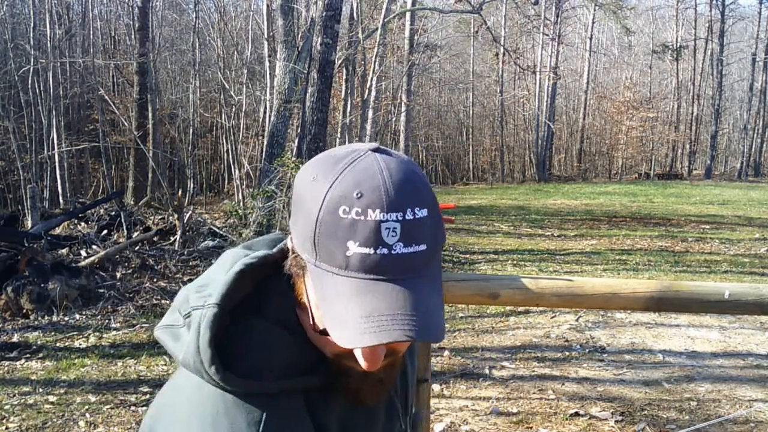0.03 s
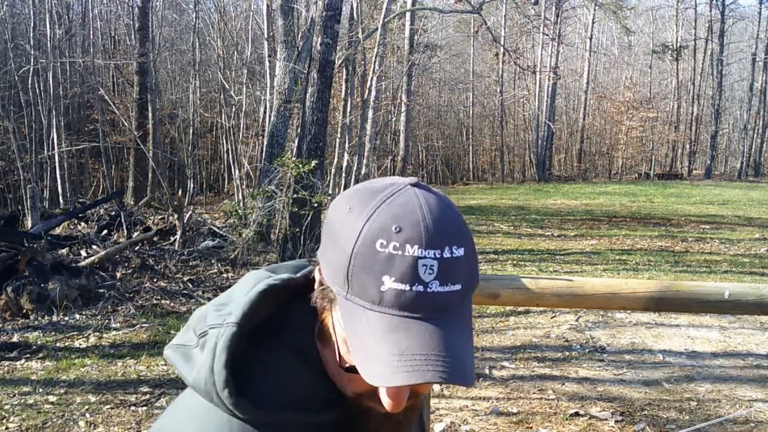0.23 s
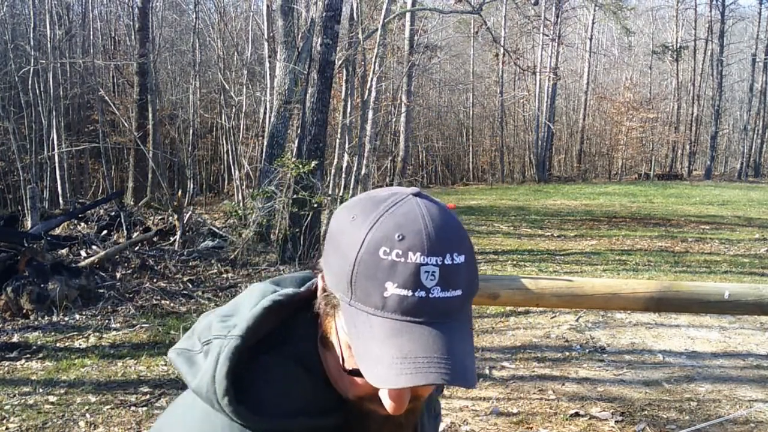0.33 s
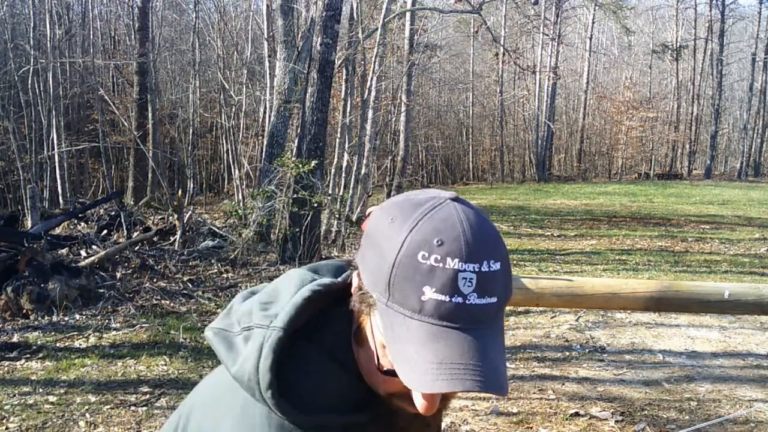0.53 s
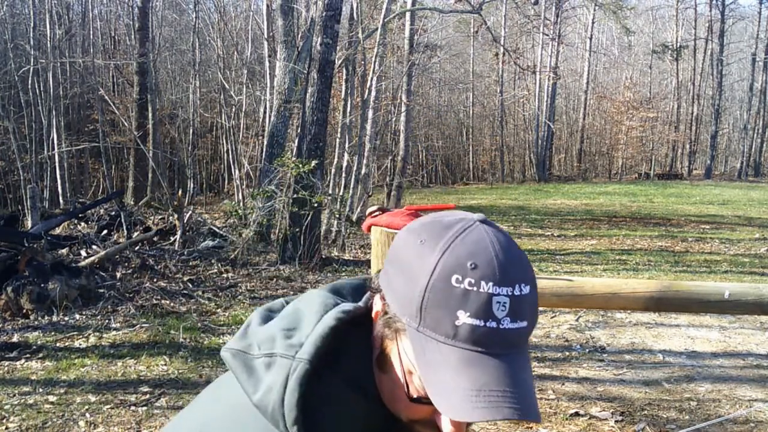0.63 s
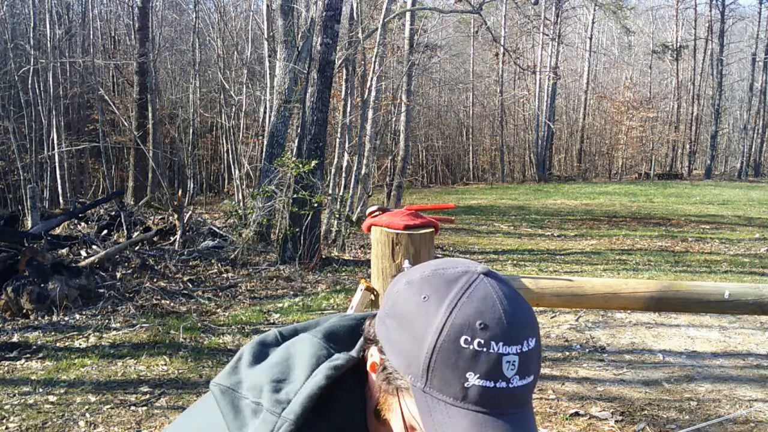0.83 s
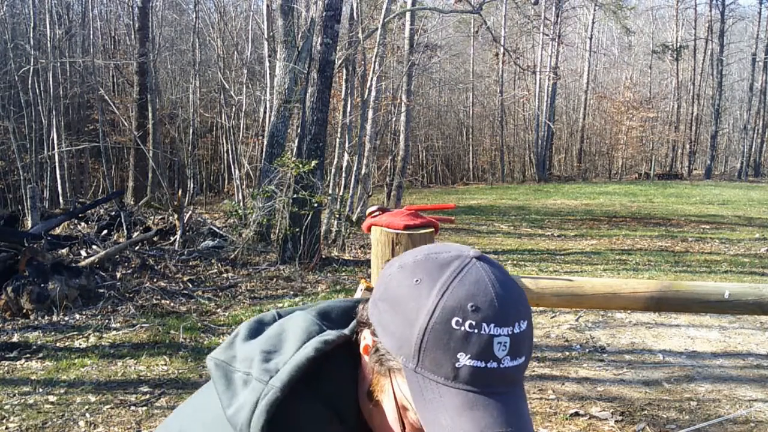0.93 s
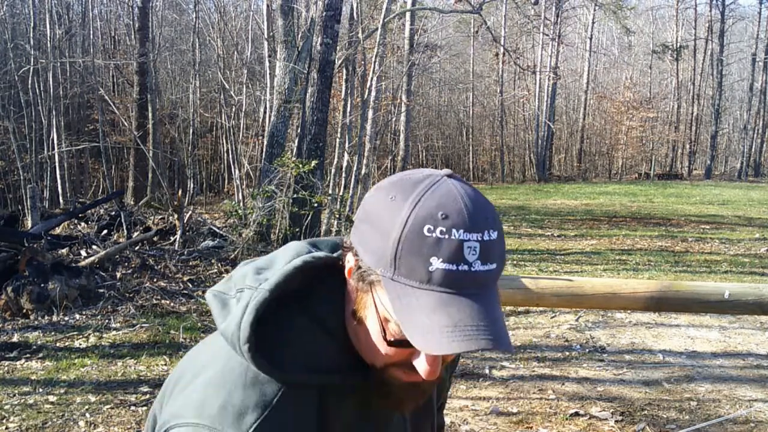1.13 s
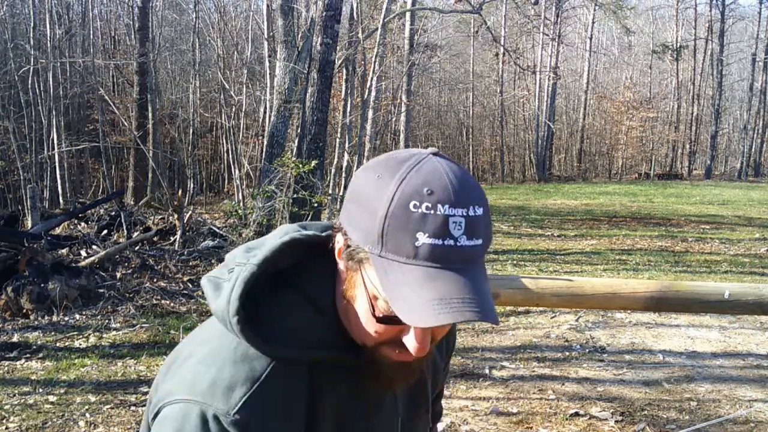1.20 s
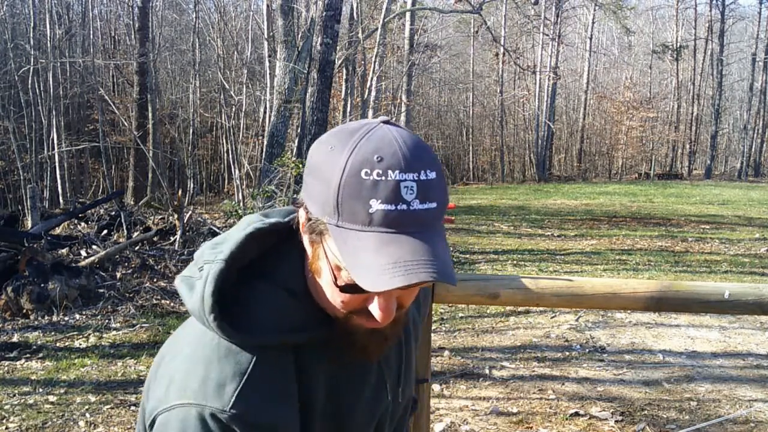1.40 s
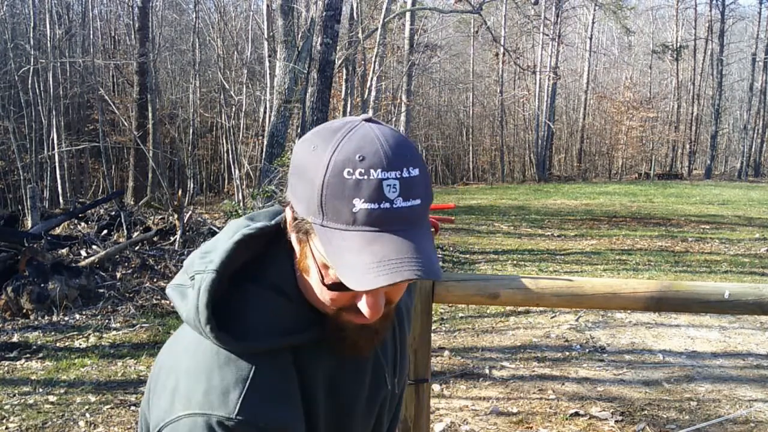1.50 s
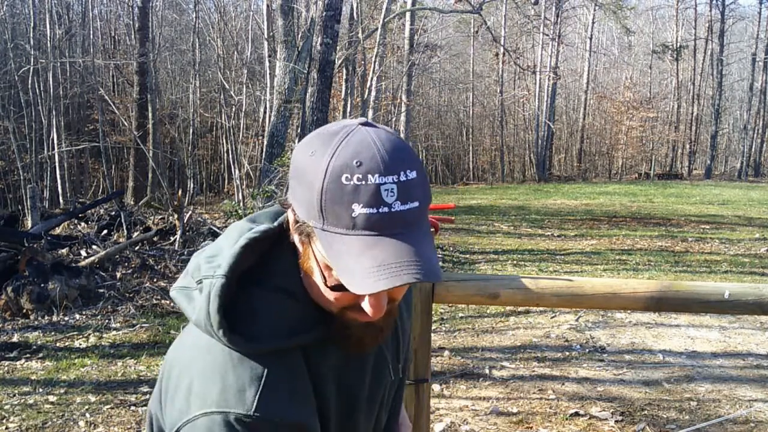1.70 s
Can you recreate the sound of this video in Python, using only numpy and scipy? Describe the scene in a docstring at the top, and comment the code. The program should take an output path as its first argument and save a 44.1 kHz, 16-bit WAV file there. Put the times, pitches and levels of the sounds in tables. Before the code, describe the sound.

A steel shovel crunches into gravel from about 0.2 seconds, with a sharp stone clack and a hollow thud on packed earth at 0.3. A lighter scrape follows around 0.7 seconds. Pebbles tick down, and a stone clinks on the steel near 1.15. From 1.5 seconds come soft scrapes, small stone clicks and a light ringing knock on the blade, over quiet outdoor air.

```python
"""A steel shovel crunches through gravel in a post hole, outdoors: one hard thrust, then lighter scrapes.
The crunch is a dense train of tiny impacts, which also excite the modes of the blade.
The thrust stops on packed earth with a thud that booms in the air column of the hole.
Pebbles tick down, a stone clinks on the steel, and the blade takes a ringing knock.
A faint echo from the trees and quiet outdoor air lie behind."""
import sys
import numpy as np
from scipy import signal
from scipy.io import wavfile
from scipy.ndimage import uniform_filter1d

SR = 44100
rng = np.random.default_rng(int(sys.argv[2]) if len(sys.argv) > 2 else 0)


def dump_mix(stems):
    """Bounce the given channels to the path in sys.argv[1] as a 16-bit WAV at rate SR."""
    frames = np.atleast_2d(stems).T  # one column per channel
    limited = np.clip(frames, -1, 1)  # hard clip at full scale
    pcm = np.round(limited * 32767).astype(np.int16)
    wavfile.write(sys.argv[1], SR, pcm)


N = 77175
T = np.arange(N) / SR

# strokes through the gravel:
# (start [s], rise [s], hold [s], level [dB], fade [dB/s], treble [dB], bass [dB])
STROKES = [(-.02, 0.0067, .03, -55, 208, 0.5, 4), (0.183, 0.023, .005, -47.5, 495, -6, -14),
           (0.221, 0.0025, 0.0045, -41, 498, -10.5, -9.5), (0.243, 0.012, 0.017, -36.5, 503, -2, -7),
           (0.268, .012, 0.013, -26.5, 591.5, 6.5, -3), (0.305, 0.0064, .02, -33.5, 606, -5, 6.5),
           (0.372, 0.053, .055, -51, 612.5, -1.5, 7), (0.654, 0.011, .075, -47.5, 168, -3.5, 1),
           (0.926, 0.012, .04, -68, 208, -20, -21), (1.208, 0.016, .02, -61, 105, 1, 4),
           (1.514, 0.012, 0.046, -54.5, 207, 10.5, 4.5), (1.649, 0.013, .085, -54, 202, 2.5, -7.5)]
# stones catching under the blade: (time [s], level [dB], time constant [s], treble [dB], bass [dB])
CATCHES = [(0.208, -44.5, 0.0032, 8.5, 0.5), (0.2345, -29.5, 0.0063, -4, -20), (0.2853, -23, 0.0026, 3, -5),
           (0.3226, -26.5, 0.0044, 0.5, 3.5), (0.34, -37, 0.0024, 11, -9), (.354, -61.5, .003, 26, 1),
           (0.485, -43, 0.0024, 2.5, 5), (0.668, -40, .006, -4, -4), (0.688, -31, 0.0091, -1, 3),
           (0.741, -43, 0.0082, 1, -15), (0.794, -42, 0.0033, -12, -0.5), (0.822, -49.5, 0.0031, -11, 6),
           (1.596, -42, .008, 11.5, -11)]
# spectrum of the crunch: (frequency [Hz], relative level [dB])
GRIT_SPECTRUM = [(100, -23), (280, -9.5), (450, -5.5), (620, 0.5), (1150, -4), (1900, 1.5), (2700, -2.5),
                 (3700, -5), (4300, -18.5), (5000, -22.5), (6000, -13), (7100, -18.5), (8000, -31.5),
                 (9000, -45)]
# modes of the blade: (frequency [Hz], relative level [dB], time to fall 65 dB [s])
BLADE_MODES = [(491.6, -10, 0.23), (760, -10.5, 0.32), (767, -8, 0.48), (1100, -15.5, 0.48),
               (1667, -7.5, 0.41), (1915, 1.5, 0.092), (2110, -27.5, .13), (2300, -2.5, .08),
               (2893, 7, 0.073), (3510, -5.5, .14), (4053, 3, 0.018), (4554, -2.5, 0.032), (5380, -8, .04),
               (6130, -1, .04), (7220, 6, 0.016)]
# stops of the blade on packed earth: (time [s], level [dB], hold [s])
THUDS = [(0.3245, -18.5, 0.018), (.3755, -33, .005)]
# air modes of the hole, strongest first: (frequency [Hz], relative level [dB], time to fall 61 dB [s])
HOLE_MODES = [(169.5, 0, 0.095), (124, -21, 0.05), (235, -46, .05), (574, -4.5, 0.032)]
# envelope of the hollow hum: (time [s], level [dB])
HUM_ENVELOPE = [(0, -69.5), (.28, -58.5), (.43, -55.5), (.535, -46), (.62, -65), (.68, -45), (.79, -55.5),
                (.88, -61.5), (.97, -53.5), (1.06, -65), (1.25, -58), (1.6, -60), (1.75, -63)]
# stone on stone: (time [s], peak [dB], centre [Hz], bandwidth [octaves], time constant [s])
CLACKS = [(.020, -44, 2470, 2, .001), (0.2074, -34, 1200, 2.1, 0.0038), (.2362, -27, 1660, 1.1, 0.0024),
          (0.2968, -12.5, 2800, 0.72, .0018), (0.97, -45, 2330, 0.9, 0.0017),
          (1.1284, -42, 3300, 0.77, 0.0033), (1.1498, -38, 1860, 0.99, 0.0018), (1.237, -40, 1600, 2, .001),
          (1.263, -47.5, 3000, 0.68, 0.00056), (1.5202, -33.5, 5100, 0.71, 0.00093),
          (1.528, -33.5, 2500, 1.15, 0.0034), (1.5449, -29, 2030, 2.24, 0.00064),
          (1.555, -41, 6160, 0.41, 0.0015), (1.572, -40, 2600, 1.3, 0.0006), (1.578, -44, 5530, 0.59, .001),
          (1.665, -46.5, 3570, 0.93, .002), (1.7425, -38, 3020, .35, 0.0048)]
# modes of a stone's clink on steel: (frequency [Hz], relative level [dB], time to fall 65 dB [s])
CLINK_MODES = [(1143, -24, .8), (1560, -10.5, .04), (1620, -13, 0.22), (1791, -0.5, 0.16), (1997, -8, .12),
               (2160, -10, 0.064), (2280, -15, 0.093), (2950, -13.5, .1), (3950, -15.5, 0.054),
               (5830, -21, .05), (7370, -11, 0.017)]
# spectrum of the outdoor air: (frequency [Hz], relative level [dB])
AIR_SPECTRUM = [(15, -55), (25, -9.5), (109, -4), (178, -7), (245, -10), (475, -13), (669, -15), (814, -12),
                (876, -14), (1210, -15.5), (3220, -17), (4650, -29.5), (7050, -24), (8790, -44),
                (11400, -97), (19300, -120)]


def crunch(treble_hz=4500, bass_hz=550, blade_db=-21.5):
    """Forced vibration: grinding grit and catching stones drive the gravel and the blade's modes."""
    strokes, catches = [], []
    for start, rise, hold, db, fade, treble_db, bass_db in STROKES:
        attack = np.clip((T - start) / rise, 0, 1)
        fading_s = np.maximum(T - start - rise - hold, 0)
        strokes.append((attack * amp(db - fade * fading_s), treble_db, bass_db))
    for start, db, decay_s, treble_db, bass_db in CATCHES:
        decay = np.exp(-np.maximum(T - start, 0) / decay_s)
        catches.append(((T >= start) * amp(db) * decay, treble_db, bass_db))
    force = np.zeros(N)
    for events, noise in ((strokes, grains()), (catches, rng.standard_normal(N))):
        treble = signal.sosfiltfilt(signal.butter(2, treble_hz, "high", fs=SR, output="sos"), noise)
        bass = signal.sosfiltfilt(signal.butter(2, bass_hz, "low", fs=SR, output="sos"), noise)
        for envelope, treble_db, bass_db in events:
            force += envelope * (noise + (amp(treble_db) - 1) * treble + (amp(bass_db) - 1) * bass)
    return convolve(force, colour(GRIT_SPECTRUM)) + amp(blade_db) * convolve(force, ring(BLADE_MODES))


def grains(per_second=16000, spread_db=3, clump_db=1.98, clump_s=.004):
    """Shot noise: grains strike at random, as impulses of uneven size that swell in clumps."""
    sizes = amp(spread_db * np.minimum(rng.exponential(1, N), 4))
    clumps = unit_rms(uniform_filter1d(rng.standard_normal(N), int(clump_s * SR)))
    impulses = rng.choice([-1, 1], N) * (rng.random(N) < per_second / SR)
    return unit_rms(sizes * amp(clump_db * clumps) * impulses)


def hole_boom(rise_s=.0061):
    """Air-column resonance: the blade's sudden stop excites the modes of the hole."""
    out = np.zeros(N)
    attack = np.minimum(T / rise_s, 1)
    for start, level_db, hold in THUDS:
        after_hold = np.maximum(T - rise_s - hold, 0)
        boom = np.zeros(N)
        for k, (hz, db, fall_s) in enumerate(HOLE_MODES):
            age = after_hold if k == 0 else T  # only the strongest mode is held
            boom += amp(db) * .00091 ** (age / fall_s) * np.sin(2 * np.pi * hz * T)
        add(out, start, amp(level_db) * attack * boom)
    return out


def hole_hum(stage_width_hz=37):
    """Resonant filtering: the hole's strongest mode draws a hum from the noise of stirred earth."""
    hz = HOLE_MODES[0][0]
    resonator = signal.iirpeak(hz, hz / stage_width_hz, SR)
    hum = rng.standard_normal(N)
    for _ in range(2):
        hum = signal.lfilter(*resonator, hum)
    return unit_rms(hum) * amp(np.interp(T, *np.transpose(HUM_ENVELOPE)))


def stone_clacks():
    """Impact noise: stones sound briefly in a band set by their size, and the hole's walls reflect it."""
    stones = np.zeros(N)
    t = T[:SR // 20]
    for start, db, hz, octaves, decay_s in CLACKS:
        edges_hz = [hz * 2 ** (-octaves / 2), hz * 2 ** (octaves / 2)]
        burst = rng.standard_normal(len(t)) * np.exp(-t / decay_s)
        snap = signal.sosfilt(signal.butter(3, edges_hz, "band", fs=SR, output="sos"), burst)
        add(stones, start, amp(db) * snap / abs(snap).max())
    return stones + reflections(stones, level_db=-9.5, t60_s=.035)


def steel_strikes(clink_s=1.1497, knock_s=1.5985):
    """Free vibration: the steel rings on after a stone's clink and after a knock."""
    steel = np.zeros(N)
    add(steel, clink_s, amp(-37.5) * ring(CLINK_MODES))
    add(steel, knock_s, amp(-42.5) * ring(BLADE_MODES))
    return steel


def ring(modes):
    """Modal superposition: a struck body sounds as a sum of damped sines, here of random sign."""
    return sum(rng.choice([-1, 1]) * amp(db) * .00058 ** (T / fall_s) * np.sin(2 * np.pi * hz * T)
               for hz, db, fall_s in modes)


def reflections(sound, level_db, t60_s):
    """Reverberation: sparse reflections begin after 2 ms and decay exponentially."""
    arrivals = rng.standard_normal(N) * (rng.random(N) < .1) * (T > .002)
    return amp(level_db) * convolve(sound, arrivals * 1e-3 ** (T / t60_s))


def outdoor_air(level_db=-58):
    """Stationary noise: a quiet background, strongest in the bass."""
    return amp(level_db) * unit_rms(convolve(rng.standard_normal(N), colour(AIR_SPECTRUM)))


def colour(spectrum, size=4096):
    """Minimum phase: the Hilbert transform turns a log spectrum into a causal impulse response."""
    hz, db = np.transpose(spectrum)
    bins_hz = abs(np.fft.fftfreq(size, 1 / SR)) + 1
    log_gain = np.log(amp(np.interp(np.log(bins_hz), np.log(hz), db)))
    transfer = np.exp(np.conj(signal.hilbert(log_gain)))
    return np.fft.ifft(transfer).real[:size // 2]


def convolve(x, response):
    """Linear filtering by an impulse response scaled to unit energy."""
    return signal.fftconvolve(x, response / np.linalg.norm(response))[:N]


def amp(db):
    """Amplitude ratio of a level in decibels."""
    return 10 ** (np.asarray(db) / 20)


def unit_rms(x):
    """Normalisation to an rms of 1."""
    return x / np.sqrt(np.mean(x ** 2) + 1e-20)


def add(mix, start_s, sound):
    """Superposition of a delayed sound on the mix."""
    part = mix[round(start_s * SR):][:len(sound)]
    part += sound[:len(part)]


def scene():
    """Superposition of the digging, its faint echo from the trees, and the outdoor air."""
    digging = crunch() + stone_clacks() + steel_strikes() + hole_boom() + hole_hum()
    air = outdoor_air()
    tree_echo = reflections(digging, level_db=-40, t60_s=1)
    return (digging + tree_echo + air)[None]


def record(dry):
    """Band limiting: a steep low-pass filter removes the highest treble."""
    cutoff_hz = 8900
    lowpass = signal.firwin(511, cutoff_hz, window=("kaiser", 9), fs=SR)
    return signal.oaconvolve(dry, lowpass[None], "same")


dry = scene()
out = record(dry)
dump_mix(out)
```